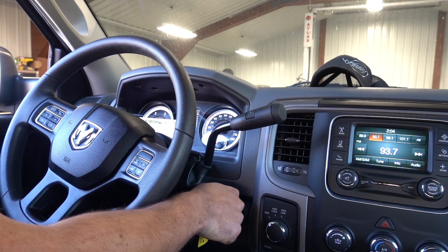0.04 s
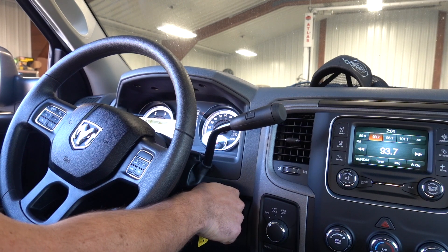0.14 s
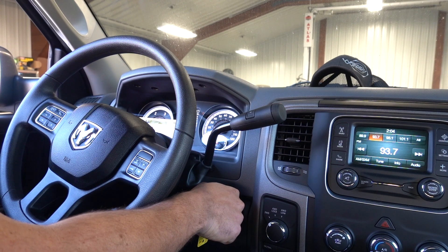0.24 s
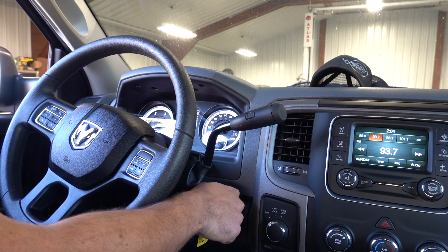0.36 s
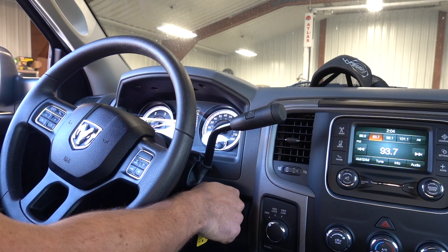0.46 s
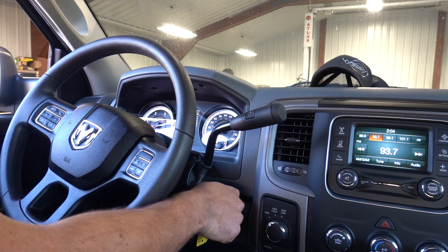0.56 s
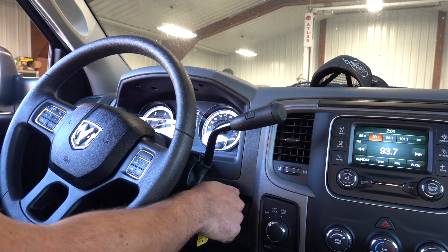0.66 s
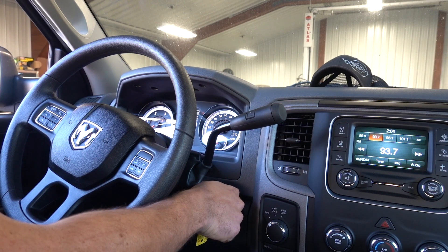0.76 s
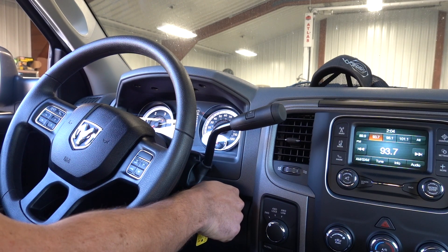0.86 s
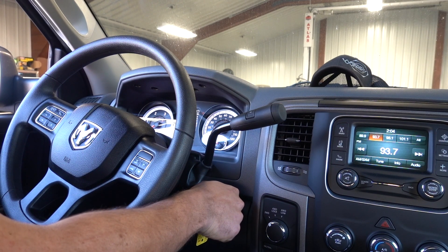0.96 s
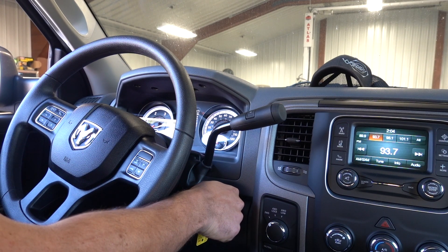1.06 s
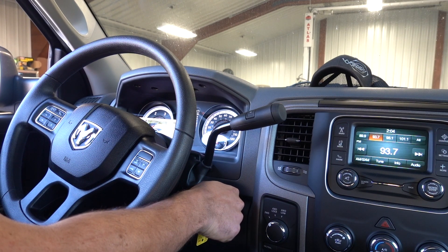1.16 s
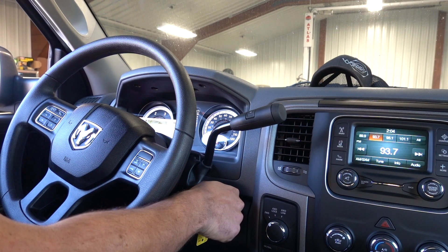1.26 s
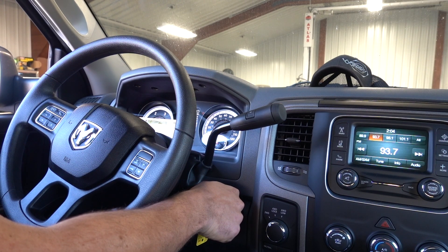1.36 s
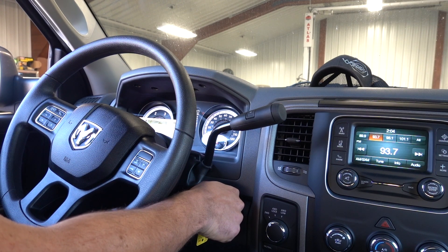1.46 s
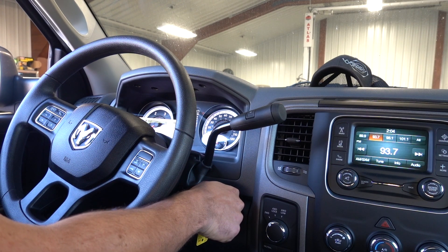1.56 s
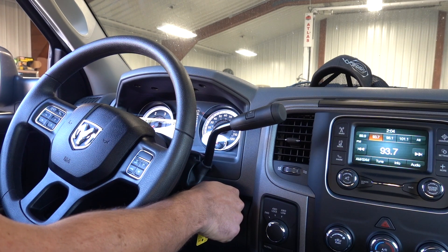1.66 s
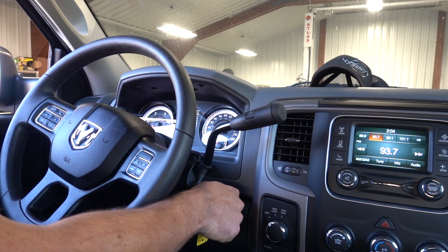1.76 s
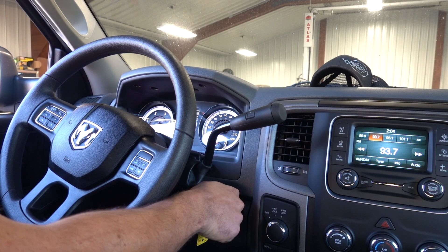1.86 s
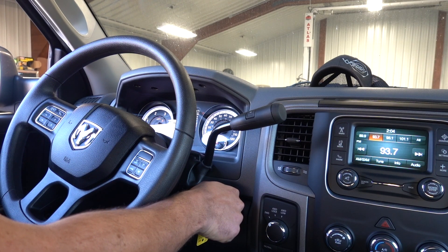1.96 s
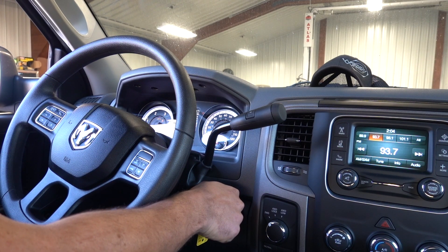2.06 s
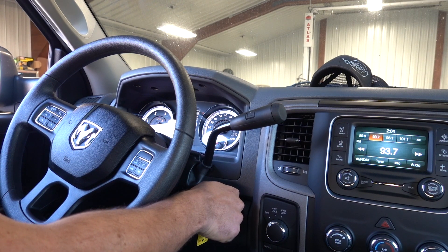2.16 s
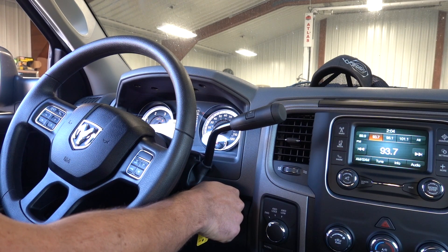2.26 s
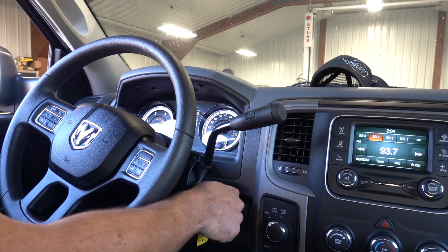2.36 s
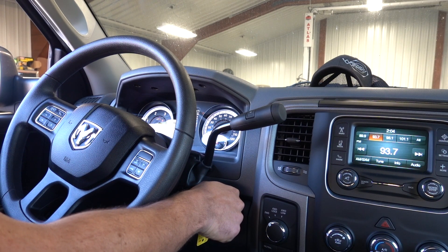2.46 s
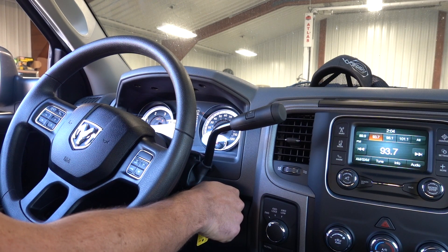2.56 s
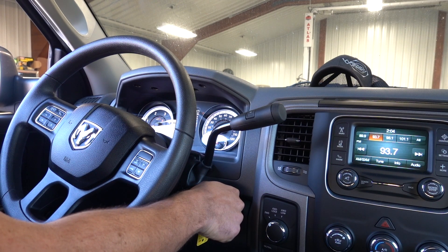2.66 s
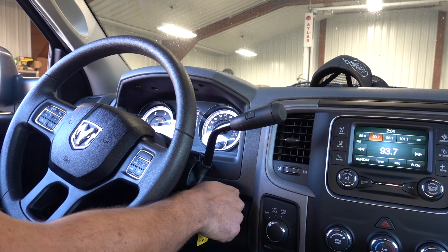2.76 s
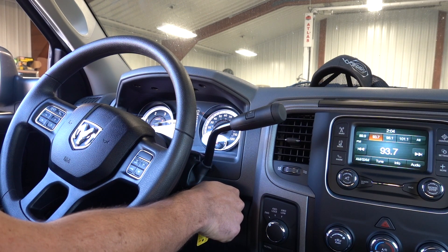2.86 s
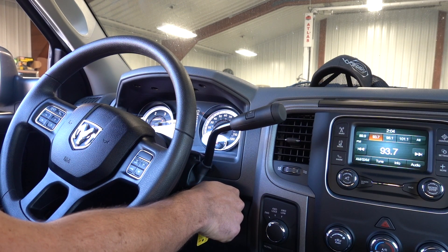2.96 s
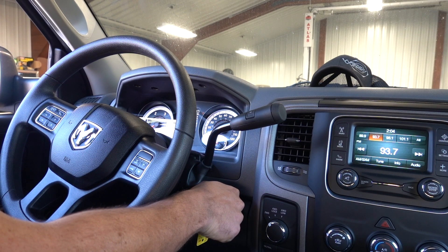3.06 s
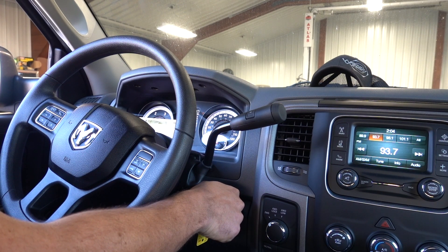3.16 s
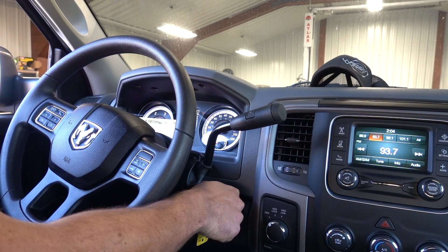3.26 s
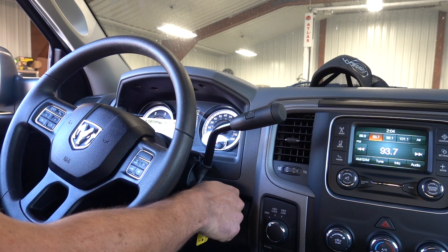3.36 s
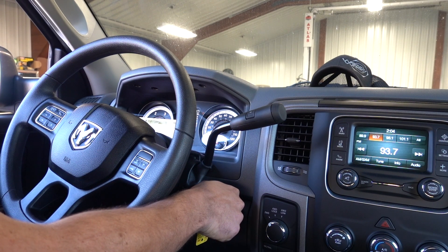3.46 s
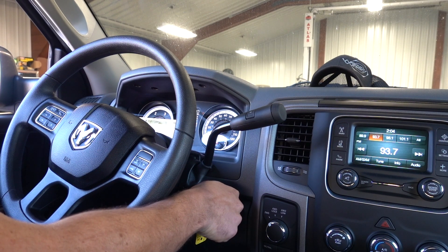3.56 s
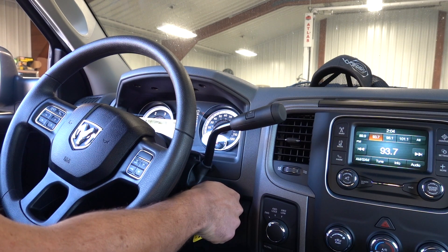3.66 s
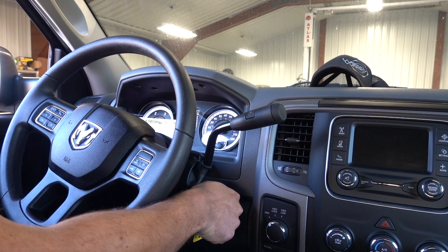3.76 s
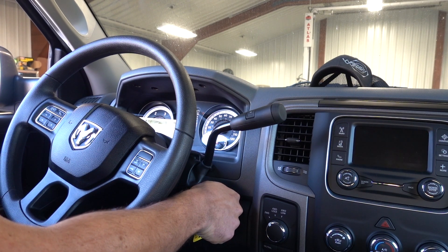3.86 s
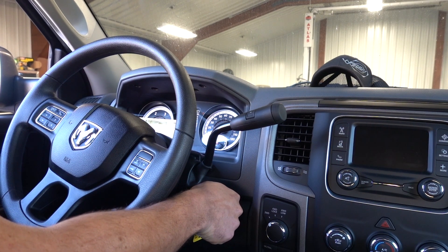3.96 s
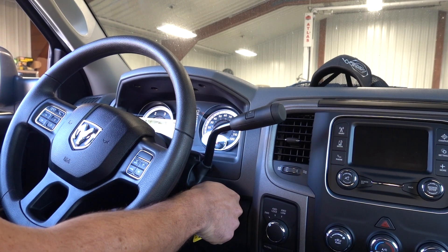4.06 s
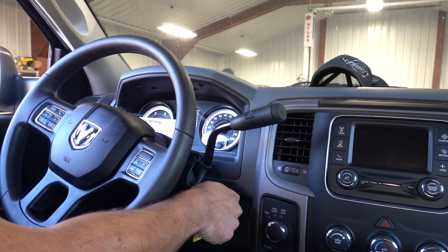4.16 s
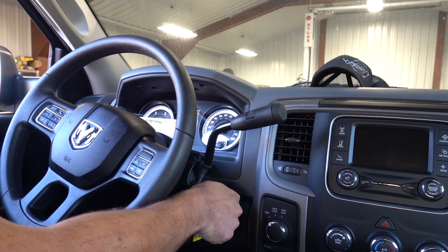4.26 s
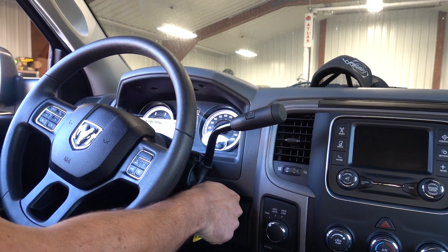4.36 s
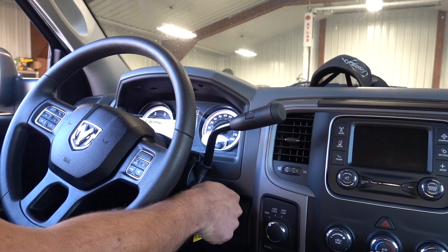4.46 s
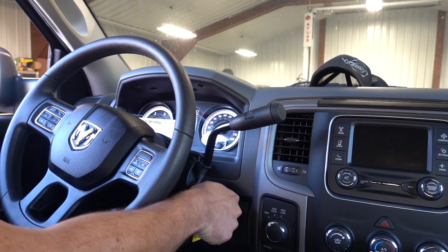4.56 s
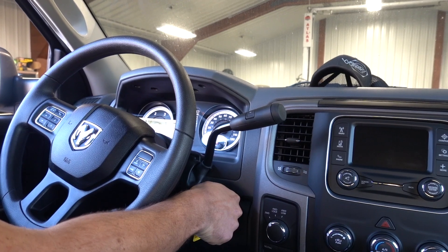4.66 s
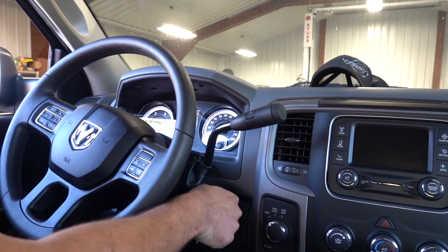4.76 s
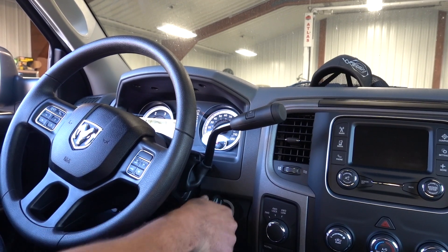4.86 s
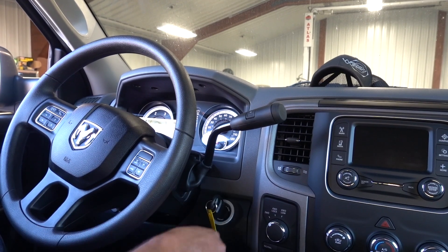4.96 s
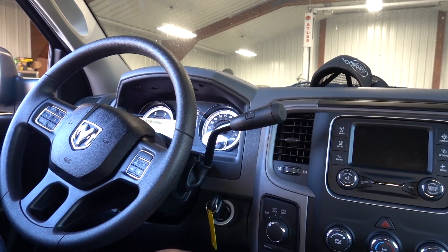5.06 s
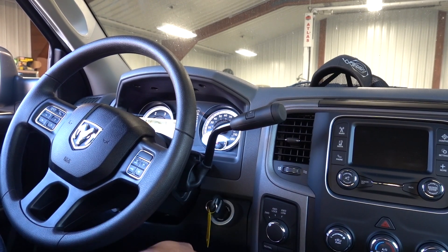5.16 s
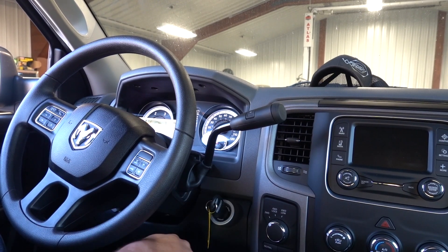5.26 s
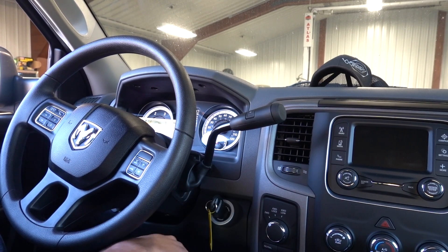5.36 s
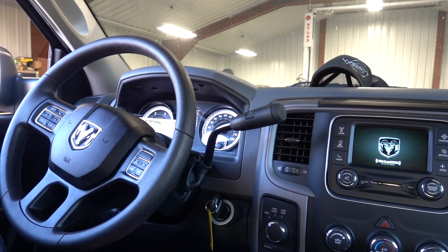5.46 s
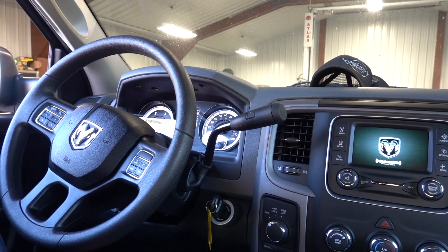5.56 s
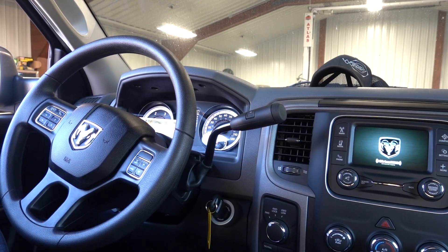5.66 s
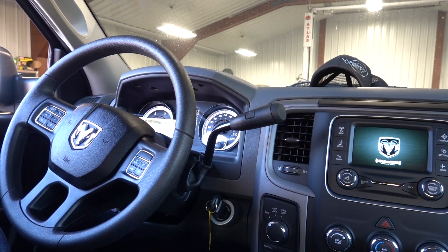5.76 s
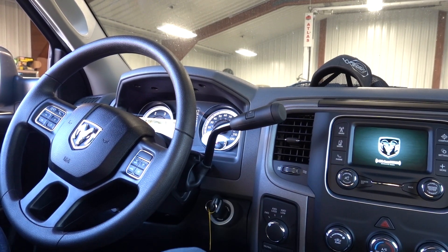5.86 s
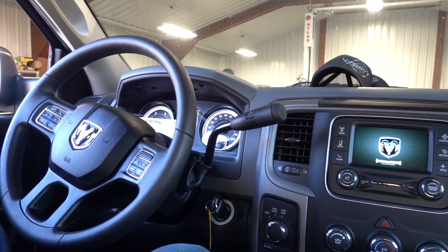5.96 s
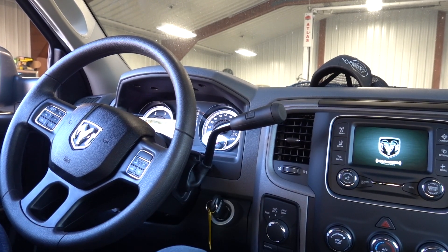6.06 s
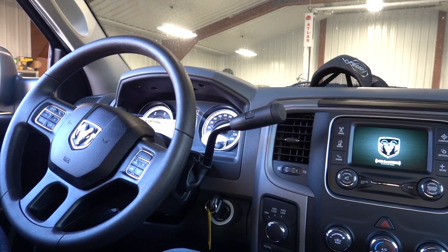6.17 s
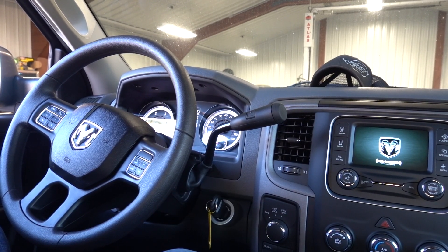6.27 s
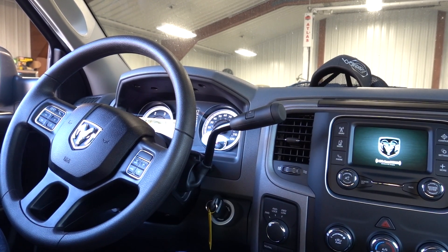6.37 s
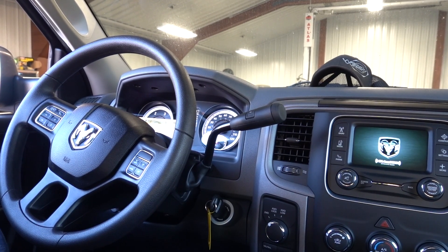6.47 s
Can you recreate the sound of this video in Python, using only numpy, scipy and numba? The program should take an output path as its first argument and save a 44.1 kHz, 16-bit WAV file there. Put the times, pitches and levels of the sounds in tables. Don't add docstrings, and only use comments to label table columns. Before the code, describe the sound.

Heard from the seat of a pickup cab in a workshop: low room rumble and faint blower air, a hand bumping trim, relay clicks and a soft fuel-pump hum. After a key click, the starter grinds and labours over slow compressions. The diesel catches with a booming flare, a sharp clack marks the starter releasing, and a deep pulsing idle with valve clatter remains.

```python
import sys
import numpy as np
from scipy import signal
from scipy.fft import rfft, irfft, next_fast_len
from scipy.io import wavfile
from scipy.ndimage import uniform_filter1d
from numba import njit

SR = 44100
rng = np.random.default_rng(int(sys.argv[2]) if len(sys.argv) > 2 else 0)


def transcribe(u):
    v = np.clip(np.atleast_2d(u).T, -1, 1)
    q = np.round(v * 32767).astype(np.int16)
    wavfile.write(sys.argv[1], SR, q)


def ratio_of_db(decibels):
    return 10 ** (np.asarray(decibels, float) / 20)


N = 287532
T = np.arange(N) / SR
STRIKE_T = np.arange(SR // 8) / SR


def curves(table):
    s, *columns = np.transpose(table)
    return [np.interp(T, s, c) for c in columns]


def hold(s, length, rise, fall):
    return np.clip(np.minimum((T - s) / rise, (s + length - T) / fall + 1), 0, 1)


def kick(s, rise, fall):
    return np.clip((T - s) / rise, 0, 1) * np.exp(-np.maximum(T - s - rise, 0) / fall)


def decay(t60):
    return np.exp(-np.log(1000) * STRIKE_T / t60)


def strike(out, s, sound):
    i = int(s * SR)
    out[i:i + len(sound)] += sound


def unit(x):
    return x / np.sqrt(np.mean(x ** 2))


def colour(x, points):
    size = next_fast_len(N + SR // 4)
    hz, db = np.transpose(points)
    log_hz = np.log(np.arange(size // 2 + 1) * SR / size + 1e-3)
    gain = ratio_of_db(np.interp(log_hz, np.log(hz), db))
    return irfft(rfft(x, size) * gain, size)[..., :N]


def ring(x, modes):
    out = 0
    for k, (hz, width, db) in enumerate(modes):
        b, a = signal.iirpeak(hz, hz / width, SR)
        out = out + (-1) ** k * ratio_of_db(db) * signal.lfilter(b, a, x)
    return out


def steep(x, modes):
    return unit(ring(ring(x, modes), modes))


def walk(rate, size=N):
    k = int(SR / rate)
    steps = np.repeat(rng.standard_normal(size // k + 1), k)
    return 1.44 * uniform_filter1d(uniform_filter1d(steps, k), k)[:size]


def noise(flicker_db, rate):
    return rng.standard_normal(N) * ratio_of_db(flicker_db * walk(rate))


def grind(size):
    hits = rng.random(size) < 1500 / SR
    teeth = hits * ratio_of_db(2.0 * rng.exponential(size=size)) * rng.standard_normal(size)
    return unit(teeth) + 1.02 * rng.standard_normal(size)


# f/Hz, level/dB per Hz
RUMBLE = [(15, -35), (25, -8), (97, -3.5), (141, -5.5), (157, -13.5), (208, -6.5), (231, -17.5),
          (264, -11.5), (337, -21), (450, -34.5), (580, -57), (990, -120)]
# f/Hz, level/dB per Hz
BLOWER = [(220, -43), (380, -4.5), (486, -10), (592, -9), (788, 2), (1200, -2.5), (1330, -1.5),
          (1800, -3.5), (2590, -14), (3520, -20.5), (4000, -25), (5200, -36), (8800, -120)]


def workshop_air():
    rumble = unit(colour(noise(1.16, 6.37), RUMBLE))
    blower = unit(colour(noise(1.0, 17), BLOWER))
    return ratio_of_db(-56.5) * rumble + ratio_of_db(-60) * blower


# f/Hz, level/dB
HUMS = [
    (59.2, -66.5),
    (129.2, -62.5),
    (204.6, -63.5),
    (15628, -71.5),
]


def electrical_hums():
    out = np.zeros(N)
    for hz, db in HUMS:
        waver_db = 2.0 * walk(4.3) * (hz < 1000)
        out += ratio_of_db(db - 0.5 + waver_db) * np.sin(2 * np.pi * hz * T)
    return out


# t/s, length/s, level/dB
RUSTLE = [
    (0.156, 0.12, -65),
    (0.27, 0.019, -57),
    (3.57, .16, -71),
    (3.758, .05, -73),
]


def hand_rustle():
    grains = steep(grind(N) * ratio_of_db(1.5 * walk(60)), [(3100, 1800, 0.045), (5500, 3100, 0.1)])
    return grains * sum(ratio_of_db(db) * hold(s, length, 0.025, .035) for s, length, db in RUSTLE)


# t/s, level/dB, f/Hz
THUDS = [
    (0.217, -28, 135),
    (0.248, -32.5, 130),
    (.285, -31, 144),
    (0.314, -36.5, 98),
    (.995, -46, 198),
    (3.62, -48.5, 258),
    (3.775, -33.5, 169),
    (3.912, -28.5, 215),
    (3.935, -29, 150),
]


def thuds():
    out = np.zeros(N)
    envelope = decay(0.1) * np.minimum(STRIKE_T / .002, 1)
    overtone = .5 * np.sin(2 * np.pi * 300 * STRIKE_T)
    for s, db, hz in THUDS:
        body = np.sin(2 * np.pi * hz * STRIKE_T) + overtone
        strike(out, s, -ratio_of_db(db + 1.5) * body * envelope)
    return out


# t/s, tick/dB, knock/dB, snap/dB, tick f/Hz
CLICKS = [(0.2484, -49, -53, -64, 2380), (0.281, -30.5, -39.5, -33, 2640), (0.484, -54, -55.5, -73, 3440),
          (0.749, -59, -65, -73, 3100), (0.7963, -43, -52.5, -73, 3100), (0.8606, -55, -59, -60, 2200),
          (1.0036, -57, -54.5, -71, 2360), (3.5206, -58, -52.5, -78, 3100), (3.6105, -50.5, -54, -77, 2120),
          (3.705, -57, -45, -78, 2170), (3.7763, -50, -35.5, -85, 4020), (4.836, -17.5, -27, -23.5, 3340)]


def clicks():
    t60, rise = 0.047, 0.0018
    plastic = [(520, 196, 0.5), (970, 247, 0.5), (1314, 134, -0.5), (2060, 500, -10.5)]
    out = np.zeros(N)
    for s, tick_db, knock_db, snap_db, hz in CLICKS:
        burst = rng.standard_normal((3, len(STRIKE_T)))
        snap = steep(burst[2], [(8100, 5800, 0.1)]) * decay(0.57 * t60)
        tick = steep(burst[0], [(3260, 3000, 0.1)]) + 1.2 * np.sin(2 * np.pi * hz * STRIKE_T)
        tick *= decay(t60)
        knock = unit(ring(burst[1], plastic)) * decay(2.94 * t60)
        click = ratio_of_db(snap_db + 1.0) * snap + ratio_of_db(tick_db - 5) * tick + ratio_of_db(knock_db + 1) * knock
        strike(out, s, np.minimum(STRIKE_T / rise, 1) * click)
    return out


# t/s, level/dB
COIL = [
    (.25, -76),
    (.76, -79),
    (1.22, -88),
    (1.73, -81),
    (2.29, -84),
    (3.32, -87),
]


def coil_whistle():
    bursts = sum(ratio_of_db(db) * hold(s, .09, .02, .02) for s, db in COIL)
    return bursts * steep(noise(.5, 9), [(11200, 140, 0.1)])


def seat_sway():
    return ratio_of_db(-52) * kick(0.5, 0.041, 0.04) * steep(noise(.5, 8), [(37, 60, 0.1)])


# t/s, level/dB
TICKS = [
    (0.9492, -64),
    (1.2544, -66),
    (1.3962, -62),
    (1.5394, -62),
    (1.6739, -65),
    (1.8093, -64),
    (1.9335, -64),
]


def relay_ticks():
    out = np.zeros(N)
    for s, db in TICKS:
        burst = rng.standard_normal(len(STRIKE_T))
        tick = steep(burst, [(7700, 500, 0.1), (9450, 830, -2)]) * decay(0.035)
        strike(out, s, ratio_of_db(db - 1.5) * tick)
    return out


def motor_tone(table, sag, fade):
    out = np.zeros(N)
    for s, length, hz, db in table:
        t = T - s
        droop = 1 - sag * t / 2
        level = hold(s, length, fade, fade) * ratio_of_db(db + 2.0 * walk(29.4))
        out += level * np.sin(2 * np.pi * hz * t * droop)
    return out


# t/s, length/s, f/Hz, level/dB
PUMP = [
    (1.12, 1.4, 96.6, -54),
    (2.86, .2, 93.5, -57.5),
    (3.3, 0.534, 93.2, -63),
]
# t/s, length/s, f/Hz, level/dB
SQUEAL = [
    (1.56, 0.39, 3600, -77.5),
    (2.32, .25, 3700, -84),
]


def fuel_pump():
    return motor_tone(PUMP, sag=0.011, fade=0.058) + motor_tone(SQUEAL, sag=.12, fade=.05)


@njit
def svf(x, hz, width):
    y, band, low = np.empty(len(x)), 0., 0.
    for i in range(len(x)):
        g, k = np.tan(np.pi * hz[i] / SR), width / hz[i]
        v = (band + g * (x[i] - low)) / (1 + g * (g + k))
        band = 2 * v - band
        low = low + 2 * g * v
        y[i] = k * v
    return y


def resonate(hz, width):
    return svf(svf(grind(len(hz)), hz, 1. * width), hz, 2. * width)


def gear(modes, size):
    out = np.zeros(size)
    for hz, width, db in modes:
        flare = ratio_of_db(db + 2.0 * walk(23.12, size=size))
        out += flare * resonate(hz * (1 + 0.0071 * walk(10.4, size=size)), width)
    return unit(out)


# t/s, relative spin (1 at its fastest, below 0 as it runs down)
MOTOR = [
    (3.906, 0),
    (3.955, .2),
    (4.13, 0.15),
    (4.4, 0.41),
    (4.48, 0.64),
    (4.55, 0.54),
    (4.63, 1),
    (4.76, .3),
    (4.9, -.3),
]
# t/s, shake/dB, mounts/dB
COMPRESSIONS = [
    (3.96, 9, 2),
    (4.095, 4.5, 3.5),
    (4.257, 11.5, 8),
    (4.414, 8, 8.5),
    (4.529, 3, 4),
    (4.59, 15, 3),
]
# f/Hz, width/Hz, level/dB
HOUSING = [(819, 26, -3.5), (1180, 90, -17), (1140, 540, -5)]
# f/Hz, width/Hz, level/dB
PINION = [(1536, 73, 3), (1970, 78, 1), (2380, 290, -3.5), (1930, 780, -4)]
# f/Hz, width/Hz, level/dB
RING_GEAR = [(2643, 45, -0.5), (2980, 42, 3), (3142, 123, 2), (3937, 64, -3), (3100, 1750, -6.5)]
# f/Hz, level/dB per Hz
BRUSHES = [(2470, -8), (4200, 0.5), (5840, -7), (7640, 1.5), (8690, -7.5), (11800, 0), (15100, -13),
           (16000, -38)]
# f/Hz, width/Hz, level/dB
SHAKE = [(41.7, 8.3, -3.5), (103, 89, -12)]
# f/Hz, width/Hz, level/dB
MOUNTS = [(194, 57, -4.5), (327, 43, 1.5), (442, 170, -9.5)]
CRANKING = slice(int(3.85 * SR), int(4.95 * SR))


def starter():
    engage, unload, drop_out, coast = 3.908, 4.6, 4.84, 0.14
    spin = curves(MOTOR)[0][CRANKING]
    size = len(spin)
    bite = kick(engage, 0.022, 0.041)
    kicks = np.array([kick(s, 0.0051, 0.056) for s, *_ in COMPRESSIONS])
    load = kicks.sum(axis=0)
    shake_db, mount_db = np.transpose(COMPRESSIONS)[1:] @ kicks

    housing_db = -35 + 3.5 * load + 4.5 * bite - 44 * np.maximum(T - unload, 0)
    pinion_db = -33 + 2.5 * bite - 7 * (T - engage)
    brush_db = -49 + 5.5 * spin ** 2 + 4.5 * load[CRANKING]

    whine = unit(resonate(1033 + 130 * spin, 68))
    whine *= np.clip(0.43 + 0.81 * kicks[1:].sum(axis=0)[CRANKING], 0, 2)
    song = unit(resonate(1827 * (1 + .015 * walk(12.8, size=size)), 113))
    song *= 1.22 * kick(engage, .02, 0.38)[CRANKING]
    motor = ratio_of_db(housing_db[CRANKING]) * (whine + gear(HOUSING, size))
    motor += ratio_of_db(pinion_db[CRANKING]) * (song + gear(PINION, size))
    motor += ratio_of_db(-34.5 + 9 * spin) * gear(RING_GEAR, size)
    motor += ratio_of_db(brush_db) * unit(colour(noise(2.9, 29.91), BRUSHES))[CRANKING]

    out = ratio_of_db(-36.5 + shake_db) * hold(engage, 1, .08, 1) * steep(noise(1.2, 10), SHAKE)
    out += ratio_of_db(-41 + mount_db + 10.5 * bite) * unit(ring(noise(1.5, 18), MOUNTS))
    out *= hold(engage, unload - engage + .03, .008, 0.035)
    out[CRANKING] += (hold(engage, drop_out - engage, 0.013, coast) ** 2)[CRANKING] * motor
    return out


# t/s, firing rate f/Hz, boom/dB
CRANK = [
    (4.55, 21.89, -34),
    (4.63, 38.01, -24),
    (4.68, 45.83, -13.5),
    (4.8, 43.37, -15.5),
    (4.88, 40.84, -20),
    (5.1, 39.26, -22.5),
    (5.4, 38, -19.5),
    (5.85, 37.04, -19.5),
    (6.52, 35.86, -18.5),
]
ORDERS_DB = {6: -28.5, 9: -40.5, 12: -22.5, 15: -26.5, 16: -31, 17: -37, 18: -27.5, 19: -43, 20: -35, 21:
             -19.5, 22: -41, 23: -37, 24: -31.5, 27: -36.5, 30: -41, 33: -36.5, 36: -32.5, 41: -37.5, 45:
             -37.5}
# f/Hz, width/Hz, level/dB
BOOM = [(45.7, 17, -2.5), (97.5, 28.5, 0), (124.1, 24.5, 1.1)]
# f/Hz, width/Hz, level/dB
PANELS = [(198, 18, -0.84), (258.4, 25, -1), (324.7, 38, -1.5), (411.7, 58, -5.5)]
# f/Hz, level/dB per Hz
CLATTER = [(260, -4.5), (450, -1.5), (530, -6), (589, -3), (757, -7.5), (826, 0), (927, -6.5), (1300, -3),
           (1650, -8), (2340, -11), (4500, -22), (5850, -33.5), (9900, -120)]
# f/Hz, level/dB per Hz
HISS = [(2060, -22), (3500, -5.5), (4000, -1.5), (4780, -11.5), (5710, -8), (7370, -11), (13100, -17),
        (16000, -30)]
# t/s, length/s, level/dB
PUFFS = [
    (5.49, 0.19, 5),
    (5.967, 0.09, 1.5),
]
RUNNING = slice(int(4.5 * SR), N)
CATCH_S, FLARE_S = 4.56, 4.67


def crank_orders(turns, since):
    odd_db = (1 - 22 * np.exp(-since / 0.36))[RUNNING]
    angle = 2 * np.pi * turns[RUNNING] / 6
    lag = 1.4 * rng.standard_normal(len(ORDERS_DB))
    lines = np.zeros(N)
    for (k, db), a in zip(ORDERS_DB.items(), lag):
        late = k % 3 > 0 or k == 21
        level = ratio_of_db(db + late * odd_db + .5 * walk(5, size=len(angle)))
        lines[RUNNING] -= level * np.cos(k * angle + a)
    return lines


def firing_blows(turns, hz):
    at = np.flatnonzero(np.diff(np.floor(turns)))
    jitter, strength = rng.standard_normal((N // 200, 2))[:len(at)].T
    blows = np.zeros(N)
    blows[np.clip(at + (90 * jitter).astype(int), 0, N - 1)] = -ratio_of_db(2.2 * strength)
    return unit(blows * np.sqrt(hz[-1] / hz))


def flare(idle_db, extra_db, fall):
    return idle_db + extra_db * kick(CATCH_S, FLARE_S - CATCH_S, fall)


def engine():
    hz, boom_db = curves(CRANK)
    turns = np.cumsum(hz) / SR
    since = np.maximum(T - FLARE_S, 0)
    even = np.clip(0.87 - (0.87 - 0.44) * np.exp(-since / 0.5), 0, 1)
    blows = firing_blows(turns, hz)

    thump = steep(blows + 0.051 * noise(2.5, 4.7), BOOM)
    boom = np.sqrt(even) * crank_orders(turns, since) * ratio_of_db(19.5) + np.sqrt(1 - even) * thump
    panels = steep(blows + 1.08 * noise(0.57, 18), PANELS)
    knock = 1 + .5 * np.exp(-(turns % 1) / 0.056)
    clatter = unit(colour(knock * noise(0.84, 15), CLATTER))
    hiss = unit(colour(noise(0.12, 12), HISS))
    hiss_db = flare(-52.5, 22.7, .12) + sum(db * hold(s, length, 0.047, 0.042) for s, length, db in PUFFS)

    body = ratio_of_db(flare(-31.5, 7.3, 0.41)) * panels + ratio_of_db(flare(-32.74, 7.8, 0.1)) * clatter
    body *= hold(CATCH_S, T[-1], FLARE_S - CATCH_S, .02) ** 2
    gate = hold(CATCH_S, T[-1], 0.012, .02)
    return gate * (ratio_of_db(boom_db) * boom + body + ratio_of_db(hiss_db) * hiss)


# f/Hz, level/dB
SIDE_DB = [(60, -63), (110, -37), (200, -16), (380, -12.5), (700, -7), (1290, -7), (2380, -6.5), (4400, -1),
           (8120, 2), (15000, -5.5)]
# f/Hz, level/dB
LEFT_DB = [(60, 2), (110, 1.5), (200, 1), (380, -0.5), (700, 2), (1290, 6), (2380, 5.5), (4400, 3.5),
           (8120, 3), (15000, 2)]


def cab_stereo(dry):
    t = np.arange(4096) / SR
    scatter = rng.standard_normal((2, 4096)) * np.exp(-t / 0.015)
    scatter /= np.sqrt(np.sum(scatter ** 2, axis=1, keepdims=True))
    scattered = signal.fftconvolve(dry[None], scatter, axes=1)[:, :N]
    side, alike = colour(scattered, [(30, -42)] + list(SIDE_DB))
    mid = dry + 0.31 * alike
    left, right = (colour(mid, [(f, sign * db / 2) for f, db in LEFT_DB]) for sign in (1, -1))
    left = left + colour(np.roll(left, 2) - left, [(1500, 0), (5000, -20)])
    return np.array([left + 1.14 * side, right - 1.17 * side])


def scene():
    quiet = workshop_air() + electrical_hums() + coil_whistle() + fuel_pump()
    handling = hand_rustle() + thuds() + clicks() + seat_sway() + relay_ticks()
    return cab_stereo(quiet + handling + starter() + engine())


def band_limit(x):
    return signal.sosfilt(signal.butter(12, 16150, fs=SR, output="sos"), x)


# f/Hz, level/dB per Hz
SELF_NOISE = [(1760, -38), (3000, -14), (3680, -5), (4320, -7), (11300, -8.5), (12500, -9.5), (16000, -3.5)]


def record(dry):
    hiss = np.array([unit(colour(rng.standard_normal(N), SELF_NOISE)) for _ in range(2)])
    mix = np.tanh(1.117 * (dry + ratio_of_db(-67) * hiss)) / 1.084
    return band_limit(mix)


dry = scene()
out = record(dry)
transcribe(out)
```